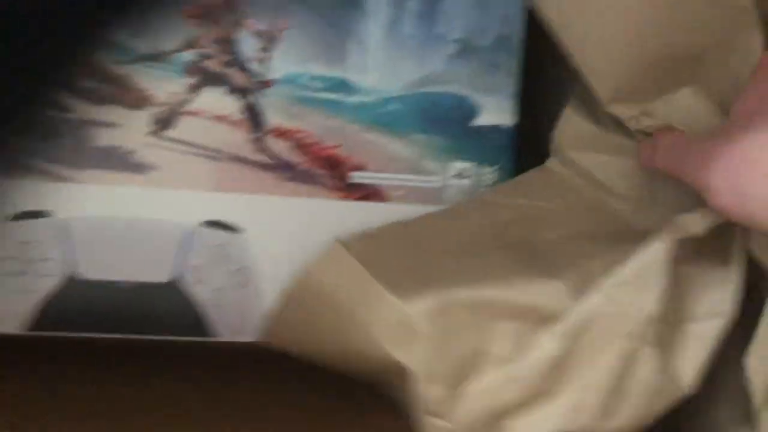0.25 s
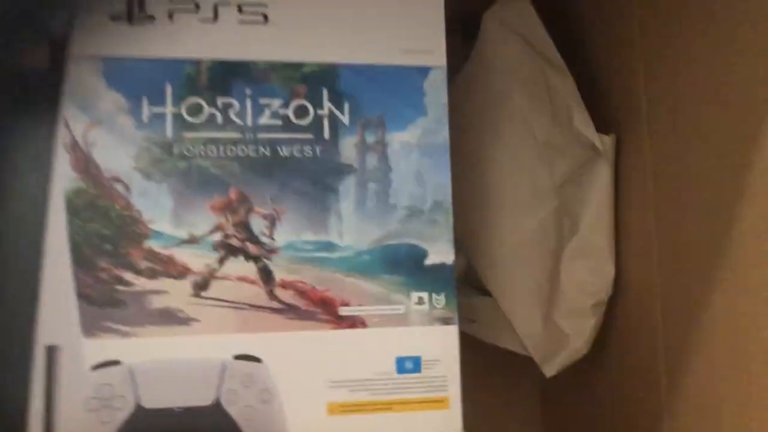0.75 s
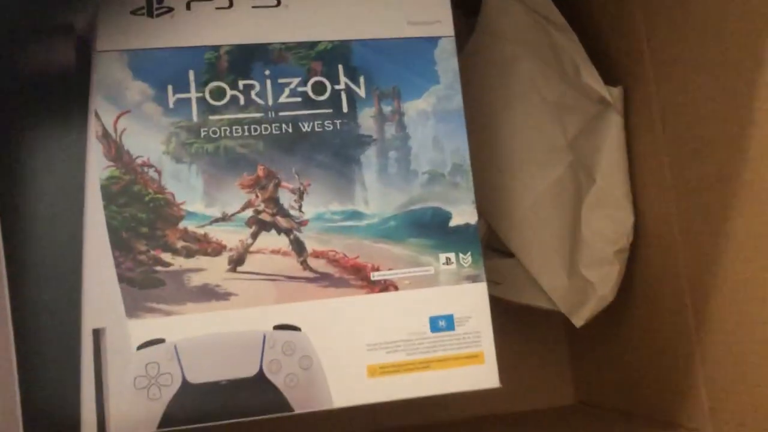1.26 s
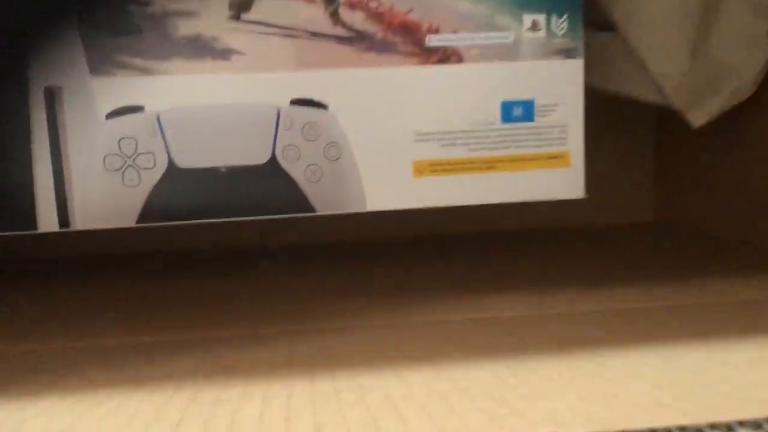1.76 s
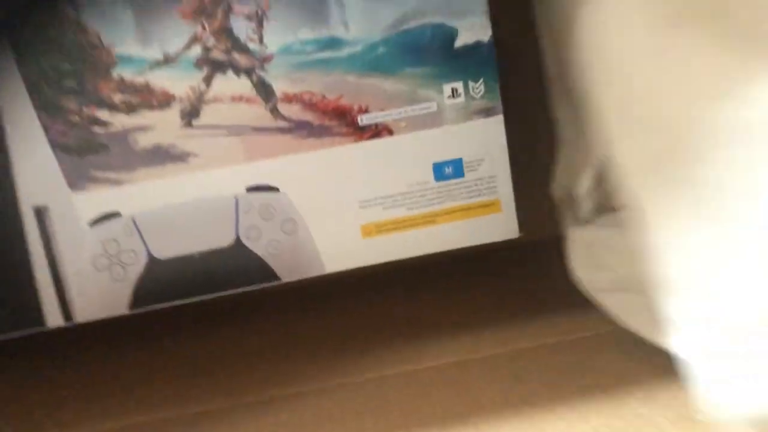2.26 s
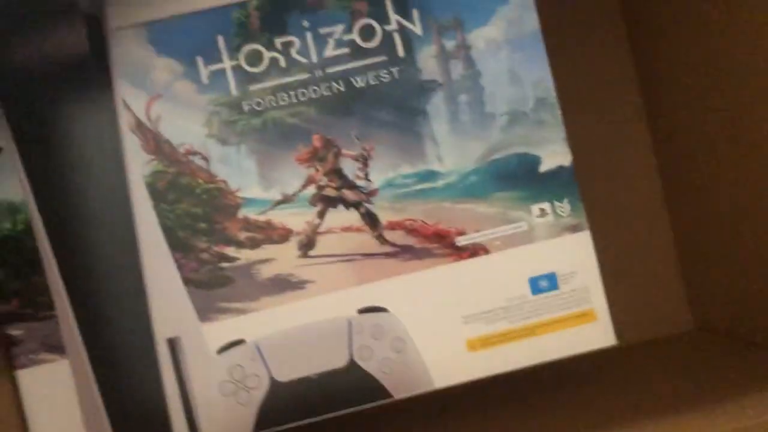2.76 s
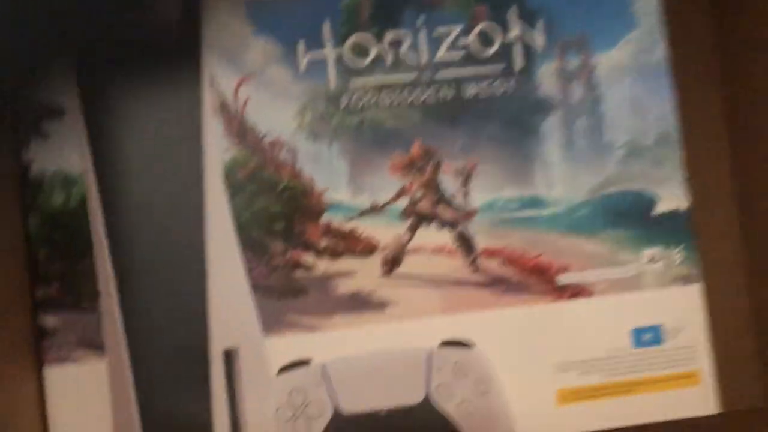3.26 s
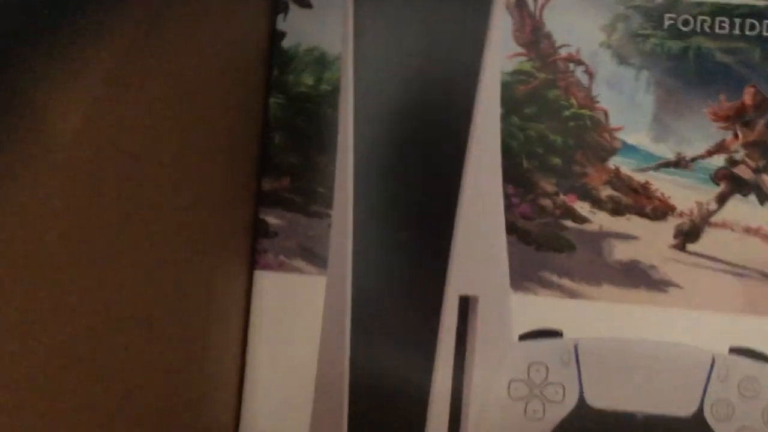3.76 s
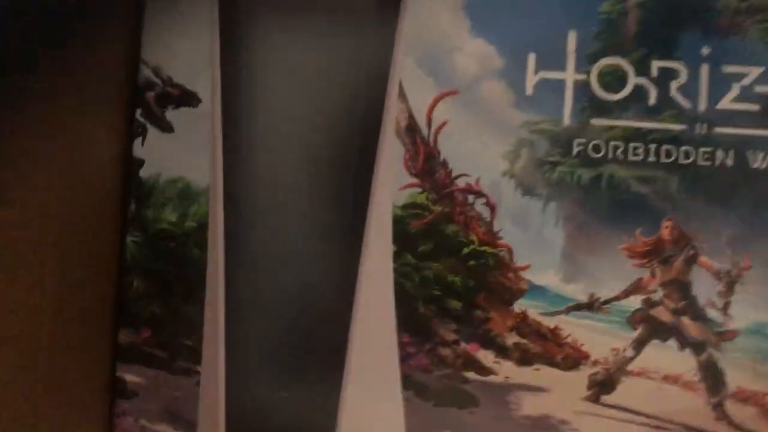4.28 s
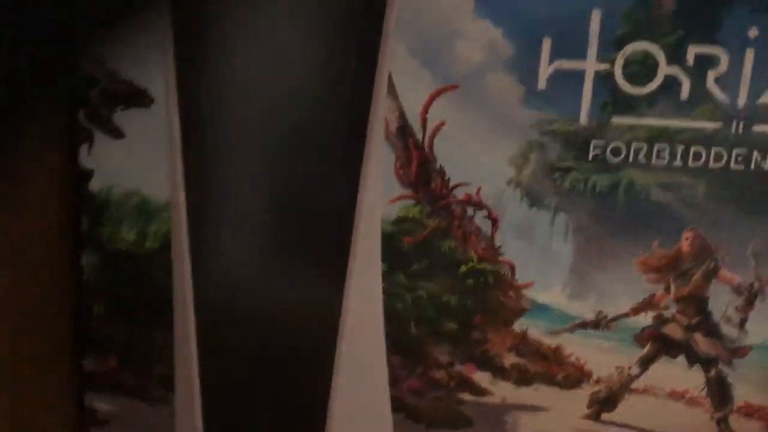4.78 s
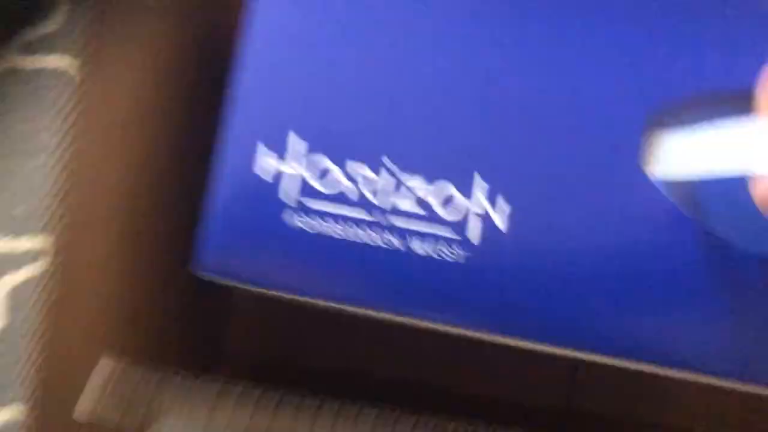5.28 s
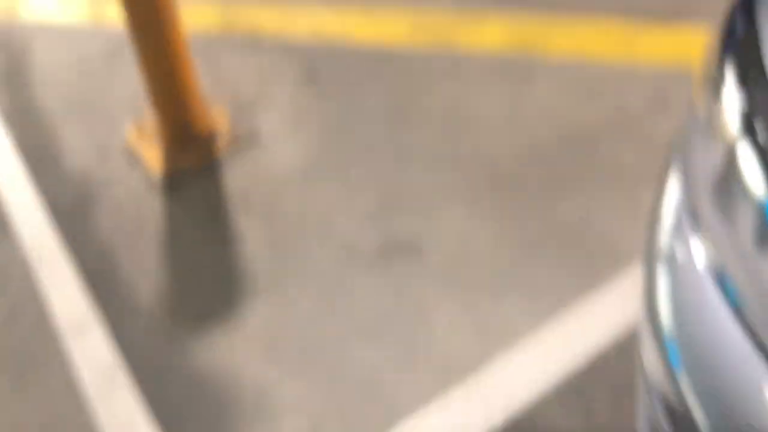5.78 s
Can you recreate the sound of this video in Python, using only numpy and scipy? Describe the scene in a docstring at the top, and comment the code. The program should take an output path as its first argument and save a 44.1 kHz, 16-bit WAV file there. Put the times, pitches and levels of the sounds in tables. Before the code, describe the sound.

Stiff packing paper crackles in bursts close up, a cardboard box thumps and creaks as dragged, then an abrupt cut to dull traffic wash.

```python
"""Paper out of a cardboard box

A hand pulls stiff packing paper out of a box at close range, then tips and drags the box.
Creases snap in clumps over a papery hiss; struck walls bump, the box booms, and dragging it creaks.
Sources: crease bursts and noise shaped by hand strokes, decaying wall tones, slips ringing a panel.
A sharp knock is cut short by a jump to an outdoor car park: a dull traffic wash and a faint rub."""
import sys
import numpy as np
from scipy import signal
from scipy.fft import rfft, irfft
from scipy.io import wavfile
from scipy.ndimage import uniform_filter1d

SR = 44100
rng = np.random.default_rng(int(sys.argv[2]) if len(sys.argv) > 2 else 0)


def master(y):
    """Save y as 16-bit WAV."""
    cut = np.clip(np.atleast_2d(y).T, -1, 1)
    pcm = np.round(cut * 32767)  # scale
    wavfile.write(sys.argv[1], SR, pcm.astype(np.int16))


N = 266097  # samples

# Hand strokes: (start [s], rise [s], hold [s], letting go [dB/s], crinkle level [dB],
# sheen re crinkle [dB], hollow body re crinkle [dB], box boom level [dB])
HAND_STROKES = [(0.055, 0.034, 0.12, 150, -34.5, -3.5, -4, -37),
                (0.192, 0.037, 0.16, 92, -31.5, -8.5, -5, -40.5),
                (0.418, .12, .03, 300, -29.5, -4.5, -8, -44),
                (0.558, 0.046, 0.066, 150, -32.5, -5, -4.5, -37),
                (0.696, 0.028, 0.017, 195, -35, -9, -2, -35.5),
                (0.84, 0.23, 0.087, 40, -47.5, -23, -2, -56), (1.285, 0.059, .03, 51, -53.5, -23, 1, -59),
                (1.537, 0.071, 0.053, 206, -50.5, -17, -6, -60.5),
                (1.712, 0.0073, 0.07, 300, -52.5, -3, 2.5, -36.5),
                (1.784, 0.14, 0.055, 498, -38, -6.5, -3, -45),
                (1.998, 0.0086, .09, 449, -32, -11, -6, -45.5),
                (2.142, .015, 0.073, 200, -43, -2.5, -10.5, -58),
                (2.237, 0.032, .18, 212, -35, -4, -8.5, -37.5),
                (2.474, 0.079, 0.037, 199, -39.5, -5.5, -8, -42),
                (2.764, 0.031, .055, 150, -42.5, -19, -7, -53),
                (2.88, .1, 0.042, 98, -45, -21, -8.5, -55.5), (3.15, 0.028, 0.018, 250, -60.5, -23, 3, -62),
                (3.631, 0.0045, .028, 90, -44.5, -1, 4.5, -31), (3.775, .02, .15, 200, -44.5, -8, -4, -42),
                (3.94, 0.014, 0.09, 174, -35.5, -4, 0, -22), (4.115, .02, 0.043, 86, -40.5, -3.5, 3.5, -25),
                (4.374, 0.031, 0.13, 100, -56.5, -9, -0.5, -44),
                (4.549, 0.019, 0.027, 150, -45.5, -9, 0.5, -38), (4.6, 0.22, .08, 200, -46.5, -3, 1.5, -39),
                (4.922, 0.027, 0.061, 85, -33.5, -2, 1, -40),
                (5.076, 0.093, 0.055, 218, -34, -3.5, -5, -29.5),
                (5.345, 0.01, .04, 303, -39, -8, 4.5, -29.5)]
# Separate crackle against smooth sliding: (time [s], share [0-1])
CRACKLE_SHARE = [(.75, .7), (.9, .55), (1.9, .5), (2.0, .45), (3.6, .5)]
# Paper spectrum: (frequency [Hz], relative density [dB/Hz])
PAPER_SPECTRUM = [(180, -20.5), (300, 13), (399, 2.5), (513, 5.5), (1250, 2.5), (2790, -1), (6340, -4.5),
                  (11800, -16), (16500, -15)]
# Box boom spectrum: (frequency [Hz], relative density [dB/Hz])
BOOM_SPECTRUM = [(25, -19), (55, 0), (226, 1.5), (321, -0.5), (430, -8), (700, -20.5), (910, -30),
                 (1540, -120)]
# Single creases giving way: (time [s], peak level [dB], patch pitch [Hz])
CREASE_SNAPS = [(0.0642, -25, 2050), (0.095, -17.5, 3950), (0.1324, -14, 1830), (0.2209, -15, 1620),
                (0.3064, -15.5, 1420), (0.3298, -9.5, 1970), (0.3566, -16, 1980), (0.3746, -18, 3400),
                (0.443, -14.5, 1940), (0.5515, -15, 2460), (0.6013, -17, 1780), (0.6246, -17, 2240),
                (0.6629, -18.5, 3300), (0.7383, -17.5, 1310), (0.94, -30.5, 3070), (1.1323, -31, 1930),
                (1.7176, -31.5, 1670), (1.794, -29, 2260), (1.9564, -20, 1410), (2.0067, -9, 2660),
                (2.0328, -10.5, 2200), (2.0398, -10.5, 2080), (2.05, -14, 2290), (2.282, -10, 4440),
                (2.4076, -10.5, 1750), (2.4428, -6, 6400), (2.459, -10, 2180), (2.789, -27, 3100),
                (2.8329, -24.5, 1380), (2.976, -29, 1910), (2.9948, -28.5, 1570), (3.5003, -39.5, 1460),
                (3.632, -27, 1360), (3.7883, -29, 1360), (3.9513, -14, 5530), (4.0454, -22, 1300),
                (4.132, -21.5, 1390), (4.1574, -22, 1530), (4.2447, -22, 1340), (4.456, -30, 1930),
                (4.504, -23.5, 3570), (4.592, -16.5, 4100), (4.7258, -29, 1700), (5.0864, -14.5, 1770),
                (5.246, -14.5, 4450), (5.2832, -21, 7120), (5.3496, -26.5, 1640)]
# Dull bumps of the box: (time [s], fundamental level before decay [dB], pitch [Hz])
BOX_BUMPS = [(0.15, -23, 214), (.2, -23, 200), (0.491, -25, 113.9), (1.725, -25.5, 97), (1.789, -25, 94),
             (2.254, -27, 113), (3.634, -18.5, 326.5), (3.649, -17.5, 323), (3.954, -15.5, 233),
             (3.974, -15, 114), (4.019, -11, 282), (4.034, -11, 181), (4.134, -17, 261), (4.16, -18, 175),
             (4.2, -19, 175), (4.46, -23, 211), (4.572, -27, 232), (5.09, -16.5, 193), (5.198, -17, 135),
             (5.496, -22, 198)]
# Box dragged on its edge, jerk by jerk: (start [s], rise [s], hold [s], level [dB])
DRAG_JERKS = [(4.943, 0.011, 0.057, -20), (5.073, 0.005, 0.0089, -29.5), (5.159, 0.028, 0.0088, -27.5),
              (5.22, .025, .008, -35)]
# Cardboard panel resonances: (frequency [Hz], width [Hz], relative level [dB])
PANEL_MODES = [(303, 26, -11), (560, 64, 2), (755, 77, -2.5), (1032, 45, -1), (1410, 200, -16)]
# Indoor background spectrum: (frequency [Hz], relative density [dB/Hz])
INDOOR_SPECTRUM = [(18, -24), (30, -1), (65, 1), (196, 1.5), (4290, -16.5), (15200, -25.5), (16500, -37)]
# Traffic spectrum: (frequency [Hz], relative density [dB/Hz])
TRAFFIC_SPECTRUM = [(15, -42), (25, -13), (78, -0.5), (979, -15), (6380, -34), (9580, -44.5), (14800, -49),
                    (16500, -63)]
# Faint bright rub outdoors: (time [s], level [dB])
RUB_LEVEL = [(5.692, -42), (5.76, -58), (5.9, -73), (6.03, -50)]

STROKE_RISE_DB = 19
SHEEN_FALL_RATIO, BOOM_FALL_RATIO = 1.3, 1.11  # letting-go rate re crinkle
DRAG_FALL_DB_PER_S = 401
SETTLE_DB, SETTLE_DB_PER_S = -20.5, 38.5  # fainter, slower settling after each stroke
KNOCK_S, JUMP_S, KNOCK_DB = 5.383, 5.3872, -8.5
INDOOR_DB, TRAFFIC_DB = -63, -36.5
BAND_LIMIT_HZ = 15800


def paper_and_box():
    """The same creases drive the sheet's crinkle, sheen and hollow body; the box booms below."""
    crinkle_power = sheen_power = body_power = boom_power = 0
    for start_s, rise_s, hold_s, fall, crinkle_db, sheen_db, body_db, boom_db in HAND_STROKES:
        crinkle_power += stroke(start_s, rise_s, hold_s, fall, crinkle_db)
        sheen_power += stroke(start_s, rise_s, hold_s, SHEEN_FALL_RATIO * fall, crinkle_db + sheen_db)
        body_power += stroke(start_s, rise_s, hold_s, fall, crinkle_db + body_db)
        boom_power += stroke(start_s, rise_s, hold_s, BOOM_FALL_RATIO * fall, boom_db)
    creases = small_creases()
    crinkle = loudness(crinkle_power) * coloured(creases, PAPER_SPECTRUM, 1550.0, 10200.0)
    sheen = loudness(sheen_power) * coloured(creases, PAPER_SPECTRUM, 10300.0)
    body = loudness(body_power) * coloured(creases, PAPER_SPECTRUM, 384.0, 1120.0)
    boom = coloured(rng.standard_normal(N), BOOM_SPECTRUM) * gain_of(2.74 * drift(35.))
    return crinkle + sheen + body + loudness(boom_power) * evened(boom)


def small_creases(rate_per_s=650., spread_db=4.2, clump_db=2.5):
    """Countless small creases in clumps, mixed with the hiss of surfaces sliding."""
    size = gain_of(spread_db * np.minimum(rng.exponential(1, N), 3.0))
    size = size * (rng.random(N) < rate_per_s / SR)
    kind = rng.integers(0, 16, N)
    crackle = np.zeros(N)
    for k in range(16):
        patch_hz = 1470.0 * 2 ** rng.uniform(0, 3)
        t60_s = rng.uniform(0.006, 0.04)
        grain = crease(patch_hz, t60_s, rng.standard_normal(1024), ring_db=4.)
        crackle += signal.oaconvolve(size * (kind == k), grain)[:N]
    share = np.clip(np.interp(np.arange(N) / SR, *np.transpose(CRACKLE_SHARE)), 0, 1)
    clumps = gain_of(clump_db * share * drift(39.0))
    sliding = rng.standard_normal(N)
    return clumps * (np.sqrt(share) * evened(crackle) + np.sqrt(1 - share) * sliding)


def crease(patch_hz, t60_s, noise, ring_db=9., skirt_db_per_octave=2.5, lump_db=3.):
    """A buckling crease: a quick noise burst that rings near the pitch of its patch of paper."""
    t = np.arange(len(noise)) / SR
    hz = np.fft.rfftfreq(len(noise), 1 / SR)
    lumps = evened(uniform_filter1d(np.sign(noise[:len(hz)]), len(hz) // 24))  # uneven spectrum
    octaves = np.log2(np.clip(hz, 500, 14000) / patch_hz)
    colour_db = ring_db * np.exp(-(octaves / 0.15) ** 2)
    colour_db = colour_db + skirt_db_per_octave * np.minimum(octaves, 0) + lump_db * lumps
    tinted = irfft(rfft(noise) * gain_of(colour_db), len(noise))
    return evened(tinted) * gain_of(-60 * t / np.clip(t60_s, .004, .2)) * np.minimum(t / 0.0006, 1)


def stroke(start_s, rise_s, hold_s, fall_db_per_s, db):
    """Power of one stroke, every 16 samples: swells, holds, dies away on letting go, settles."""
    t = np.arange(0, N, 16) / SR - start_s
    swell_db = STROKE_RISE_DB * (np.clip(t / max(rise_s, .002), 0, 1) - 1)
    after_s = np.maximum(t - rise_s - hold_s, 0)
    fade_db = np.maximum(-fall_db_per_s * after_s, SETTLE_DB - SETTLE_DB_PER_S * after_s)
    return (t >= 0) * gain_of(db + swell_db + fade_db) ** 2


def loudness(power):
    """Summed stroke power as a gain, sample by sample."""
    return np.interp(np.arange(N), np.arange(0, N, 16), np.sqrt(power))


def snaps(t60_s=0.022):
    """The loud single creases: thin, dry noise bursts, each scaled to its peak."""
    out = np.zeros(N)
    for time_s, peak_db, patch_hz in CREASE_SNAPS:
        noise = coloured(rng.standard_normal(4096), PAPER_SPECTRUM, 700.)
        burst = crease(patch_hz, t60_s, noise)
        add(out, time_s, gain_of(peak_db) * burst / abs(burst).max())
    return out


def bumps(t60_cycles=13.):
    """Each bump flexes a cardboard wall for a few cycles, with a weaker overtone."""
    out, t = np.zeros(N), np.arange(6000) / SR
    for time_s, db, hz in BOX_BUMPS:
        wall = np.sin(2 * np.pi * hz * t) + 0.37 * np.sin(2 * np.pi * 1.706 * hz * t)
        decay = gain_of(db - 60 * t * hz / t60_cycles)
        add(out, time_s, decay * wall * np.minimum(t / 0.0026, 1))
    return out


def creak(slips_per_s=70.):
    """Stick-slip at the dragged edge: nearly even clicks with short scuffs ring the panel."""
    turns = np.cumsum(slips_per_s * gain_of(.6 * drift(40.2))) / SR
    turns = turns - turns[round(DRAG_JERKS[0][0] * SR)] + 0.2987  # phase set at the first jerk
    slips = np.diff(np.floor(turns), prepend=0).clip(0, 1)
    t = np.arange(3000) / SR
    scuff = signal.oaconvolve(slips, np.exp(-t / .003))[:N]
    drive = (.4 + scuff) * rng.standard_normal(N) + 5. * slips
    ring = np.zeros(len(t))
    for hz, width_hz, db in PANEL_MODES:
        ring += gain_of(db) * width_hz * np.exp(-np.pi * width_hz * t) * np.sin(2 * np.pi * hz * t)
    drag_power = sum(stroke(start_s, rise_s, hold_s, DRAG_FALL_DB_PER_S, db)
                     for start_s, rise_s, hold_s, db in DRAG_JERKS)
    return loudness(drag_power) * evened(signal.oaconvolve(drive, ring)[:N])


def knock():
    """A hard knock: a short noisy rattle of 2-9 kHz over a push that sinks in pitch."""
    out, t = np.zeros(N), np.arange(600) / SR
    push_hz = 230.0 + 2180.0 * np.exp(-t / 0.00136)
    push = np.sin(2 * np.pi * np.cumsum(push_hz) / SR)
    rattle = coloured(rng.standard_normal(len(t)), PAPER_SPECTRUM, 2100., 8600.0) * np.exp(-t / 0.0053)
    add(out, KNOCK_S, gain_of(KNOCK_DB) * (push + 0.66 * rattle) * np.minimum(t / 0.00025, 1))
    return out


def room(x, t60_s=0.08, wet_db=-14):
    """A small furnished room answers with a short decaying tail of low-passed noise."""
    t = np.arange(SR // 3) / SR
    dull_noise = signal.lfilter([1], [1, -.5], rng.standard_normal(len(t)))
    tail = dull_noise * gain_of(-60 * t / t60_s) * (t > .003)
    return x + gain_of(wet_db) * signal.fftconvolve(x, tail / np.linalg.norm(tail))[:N]


def indoor_background():
    """Faint steady noise, strongest in the bass."""
    return gain_of(INDOOR_DB) * coloured(rng.standard_normal(N), INDOOR_SPECTRUM)


def car_park():
    """Distant traffic as dull noise that swells slowly, and a faint bright rub."""
    traffic = coloured(rng.standard_normal(N), TRAFFIC_SPECTRUM) * gain_of(TRAFFIC_DB + 0.7 * drift(9.5))
    rub = level(RUB_LEVEL) * coloured(rng.standard_normal(N), PAPER_SPECTRUM, 6300.0)
    return traffic + rub


def gain_of(db):
    """Decibels to amplitude."""
    return 10 ** (np.asarray(db) / 20)


def evened(x):
    """Scales to rms 1."""
    return x / np.sqrt(np.mean(x ** 2) + 1e-20)


def read(points, hz):
    """A spectrum table read on a log-frequency axis."""
    table_hz, value = np.transpose(points)
    return np.interp(np.log(hz + 1), np.log(table_hz + 1), value)


def coloured(x, points, lo_hz=0., hi_hz=1e5):
    """Weights x by a spectrum table between two soft edges; rms 1."""
    hz = np.fft.rfftfreq(len(x), 1 / SR) + 1e-3
    edges = 1 / np.sqrt((1 + (lo_hz / hz) ** 8) * (1 + (hz / hi_hz) ** 8))
    return evened(irfft(rfft(x) * gain_of(read(points, hz)) * edges, len(x)))


def drift(rate_per_s):
    """Slow random curve of rms 1: noise smoothed twice."""
    size = max(round(SR / rate_per_s), 2)
    return evened(uniform_filter1d(uniform_filter1d(rng.standard_normal(N), size), size))


def level(table):
    """A (time [s], level [dB]) curve as a gain, -150 dB outside its span."""
    time_s, db = np.transpose(table)
    return gain_of(np.interp(np.arange(N) / SR, time_s, db, -150, -150))


def add(mix, time_s, sound):
    """Mixes a sound in place at time_s."""
    part = mix[round(time_s * SR):][:len(sound)]
    part += sound[:len(part)]


def scene():
    """Indoors until the jump, then the car park; snaps and bumps run through, without room."""
    hits = snaps() + bumps()
    indoors = paper_and_box() + room(hits) + creak() + knock() + indoor_background()
    outdoors = hits + car_park()
    return np.where(np.arange(N) / SR < JUMP_S, indoors, outdoors)[None]


def record(dry):
    """The microphone sheds deep bass and rounds off the hardest peaks; then the band limit."""
    lean = signal.sosfilt(signal.butter(2, 30., "high", fs=SR, output="sos"), dry)
    rounded = lean / (1 + (abs(lean) / .68) ** 4) ** (1 / 4)
    low_pass = signal.firwin(511, BAND_LIMIT_HZ, window=("kaiser", 9), fs=SR)
    return signal.oaconvolve(rounded, low_pass[None], "same")


dry = scene()
out = record(dry)
master(out)
```